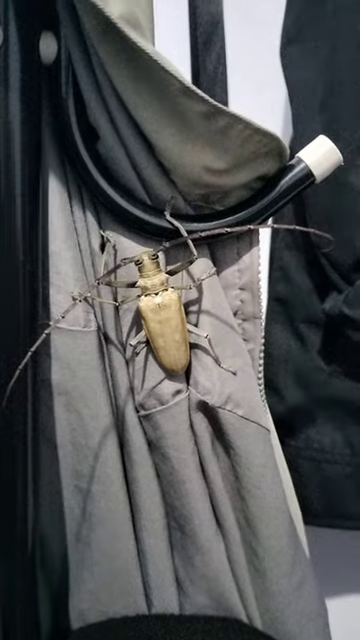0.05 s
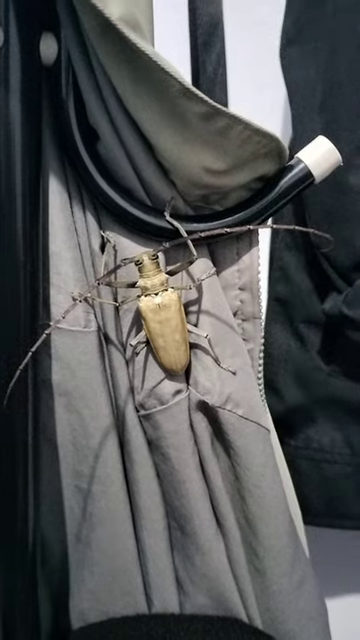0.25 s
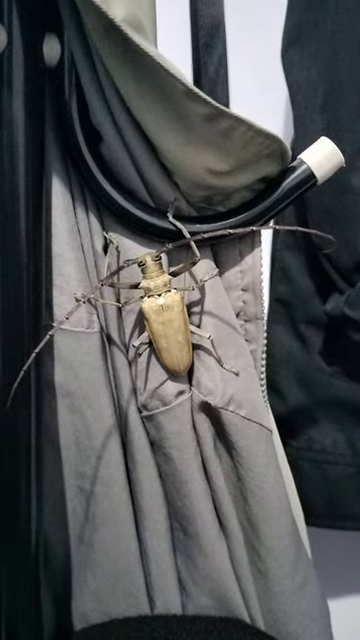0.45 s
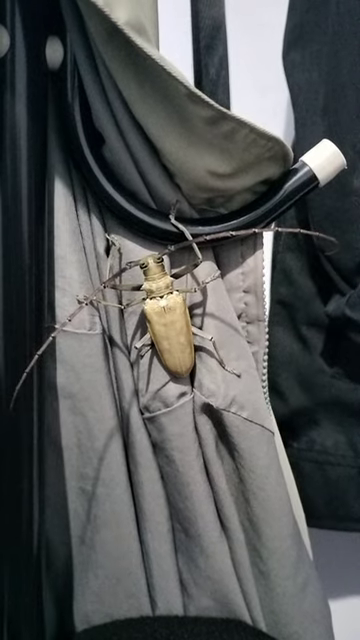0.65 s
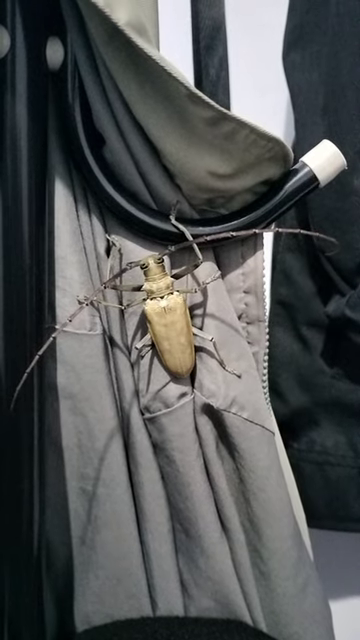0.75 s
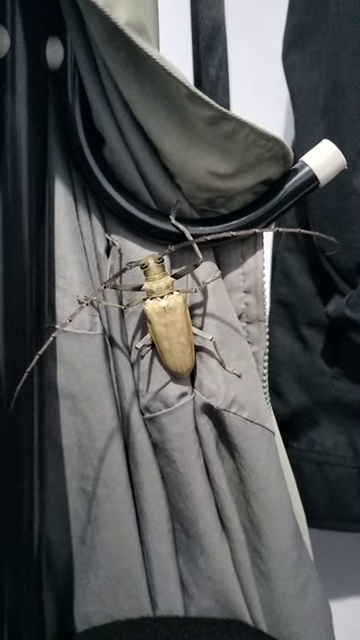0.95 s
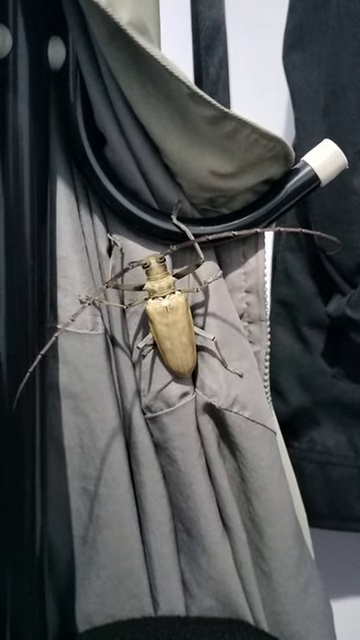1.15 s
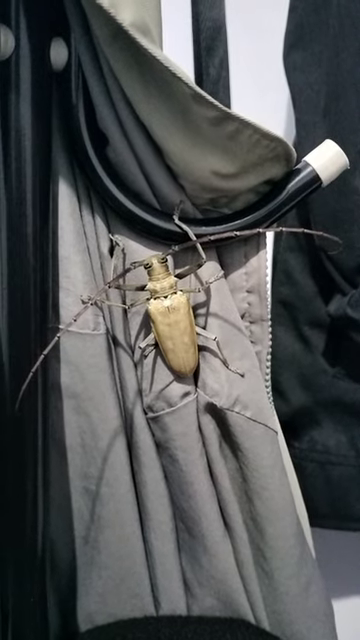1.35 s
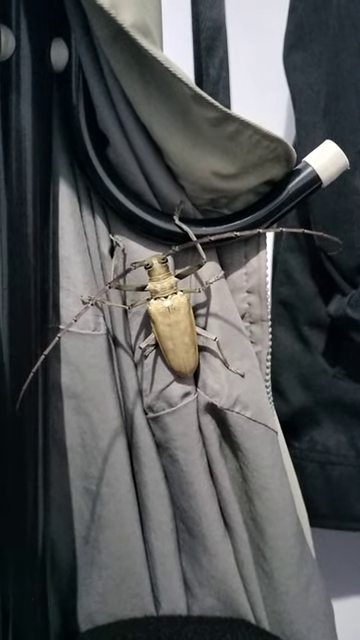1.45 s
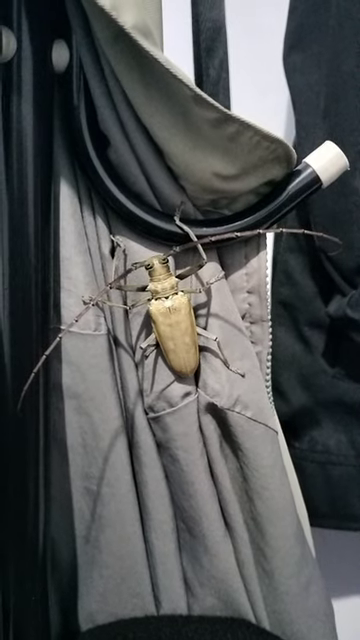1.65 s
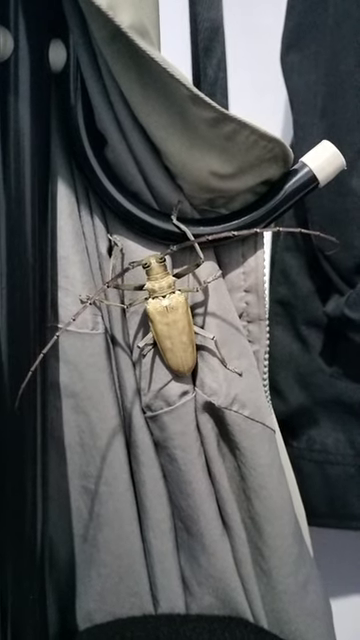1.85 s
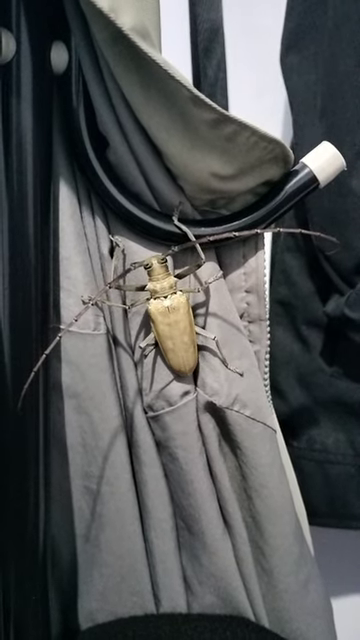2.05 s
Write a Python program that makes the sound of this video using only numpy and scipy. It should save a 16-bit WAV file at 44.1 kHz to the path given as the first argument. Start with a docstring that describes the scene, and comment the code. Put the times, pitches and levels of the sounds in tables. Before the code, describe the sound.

Cloth rustles close to the microphone from about 0.2 seconds, strongest around 0.5, then fades in a few strokes by 1.4, with short fabric groans and soft handling bumps. At 1.5 something hollow knocks a little way off, ringing briefly in the room, then scuffs and slides until 1.8. A faint whistle falls near 2 seconds. A low rumble, hum, thin hiss and faint insect-like buzz lie underneath.

```python
"""Cloth drags and rustles close to the microphone in a few fading strokes: fibre hiss and tiny snaps,
with short groans of the taut fabric and soft handling bumps. A little way off, something hollow
knocks and rings, the room answers, and the object scuffs and slides. Underneath lie a wavering hum,
a low rumble, a thin hiss and an insect-like buzz; a faint whistle falls near the end."""
import sys
import numpy as np
from scipy import signal
from scipy.fft import rfft, irfft, next_fast_len
from scipy.io import wavfile
from scipy.ndimage import map_coordinates

SR = 44100
rng = np.random.default_rng(int(sys.argv[2]) if len(sys.argv) > 2 else 0)


def waveform_to_disk(signal):
    """Save audio, clipped to [-1, 1], as 16-bit WAV at the path in sys.argv[1]."""
    frames = np.transpose(np.atleast_2d(signal))
    scaled = np.clip(frames, -1, 1) * 32767
    samples = np.round(scaled).astype(np.int16)
    wavfile.write(sys.argv[1], SR, samples)


N = 92610
SIDES = np.array([[.5], [-.5]])  # splits a left-minus-right amount between the channels


def amp(db):
    """Decibels to gain."""
    return 10 ** (np.asarray(db) / 20)


def unit(x):
    """Scale to rms 1."""
    return x / np.sqrt(np.mean(x ** 2) + 1e-20)


def clock():
    """Time of every sample in seconds."""
    return np.arange(N) / SR


def along(points, hz):
    """Read (frequency, value) points on a log frequency axis."""
    freqs, values = np.transpose(points)
    return np.interp(np.log(hz + 1), np.log(freqs + 1), values)


def eq(points):
    """A frequency response drawn through (Hz, dB) points."""
    return lambda f: amp(along(points, f))


def curves(rows):
    """One automation curve for each column after the time."""
    times, *columns = np.transpose(rows)
    return [np.interp(clock(), times, column) for column in columns]


def wobble(knots_per_s):
    """A smooth random curve."""
    return map_coordinates(rng.standard_normal(400), [clock() * knots_per_s], mode="mirror")


def filtered(x, response):
    """Pass x through a frequency response."""
    size = next_fast_len(N + SR // 2)
    return irfft(rfft(x, size) * response(np.fft.rfftfreq(size, 1 / SR)), size)[..., :N]


def resonance(f, centre, width):
    """Response of one damped resonance."""
    return 1j * f * width / (centre ** 2 - f ** 2 + 1j * f * width)


def noise():
    """Two unrelated white noises."""
    return rng.standard_normal((2, N))


def spread(pair, colour, likeness, left_lag_s=0):
    """Colour two unrelated signals and blend them into left and right, rms 1."""
    def mid_side(f):
        angle = np.arccos(np.clip(along(likeness, f), -1, 1)) / 2
        return colour(f) * np.array([np.cos(angle), np.sin(angle)])
    mid, side = filtered(pair, mid_side)
    stereo = np.array([mid + side, mid - side])
    return unit(filtered(stereo, lambda f: np.exp(-2j * np.pi * f * SIDES * left_lag_s)))


def envelope(start_s, attack_s, hold_s, t60_s):
    """Linear attack, hold and exponential release."""
    t = clock() - start_s
    return np.clip(t / attack_s, 0, 1) * amp(-60 * np.maximum(t - attack_s - hold_s, 0) / t60_s)


def friction(snaps_per_s=3000, snap_db=-3):
    """Sliding contact: hiss with tiny snaps of random size in it."""
    snaps = (rng.random((2, N)) < snaps_per_s / SR) * np.sign(noise())
    size_db = np.minimum(rng.exponential(size=(2, N)), np.pi)
    return noise() + amp(snap_db) * unit(snaps * amp(size_db))


def early_reflections(x, count=12, span_s=.025, level_db=-5.5):
    """Nearby surfaces colour the sound above the bass, differently on each side; rms 1."""
    delay = rng.uniform(0, span_s, (2, count, 1))
    sign = rng.choice([-1, 1], delay.shape)
    echoes = lambda f: (sign * np.exp(-2j * np.pi * f * delay)).sum(axis=1) / np.sqrt(count)
    return unit(filtered(x, lambda f: 1 + amp(level_db) * echoes(f) * f / (f + 700)))


# Fader ride of the strokes: time_s, level_db
STROKE_LEVELS = [(.228, -43), (.282, -42.3), (.345, -44.5), (.351, -38.5), (.47, -37.8), (.558, -38.4),
                 (.585, -42), (.615, -40.3), (.72, -44.7), (.788, -43.6), (.812, -40.5), (.838, -39.5),
                 (.885, -44), (.925, -49.5), (.98, -54), (1.082, -58), (1.102, -52), (1.162, -50.3),
                 (1.192, -54), (1.222, -49.5), (1.3, -52.8), (1.36, -59), (1.4, -66), (1.5, -70),
                 (1.7, -90)]
# Tone of the cloth: freq_hz, gain_db
CLOTH_EQ = [(35, -46), (60, -39), (91, -12.5), (124, -14.5), (193, -16), (294, -2.5), (469, -7.5),
            (503, -7.5), (698, -7), (946, -1), (1110, -9), (1470, -7), (1820, -10.5), (2090, -6.5),
            (5210, -9.5), (6900, -8.5), (8920, -23.5), (14900, -18.5), (16000, -27.5)]
# Stereo image of the cloth, wider in the treble: freq_hz, correlation
CLOTH_LIKENESS = [(30, .75), (100, 0.99), (280, 0.9), (450, .75), (700, 0.55), (1150, 0.48), (2200, 0.084),
                  (6000, 0.017)]
# Its balance: freq_hz, left_minus_right_db
CLOTH_PAN = [(400, 1.9), (1400, -3), (6500, -3.5), (8300, 9), (10500, -0.5), (14000, -2.5)]
# Its later arrival on the left: freq_hz, lag_s
CLOTH_LAGS = [(250, 0.00013), (500, 0.00022), (1100, 0.00037), (2200, 0.000471)]
def rustle(flutter_db=1.06, air_hz=8140, air_expansion=1.184, trim_db=1):
    """Cloth slides unevenly over cloth: harder strokes are louder and brighter."""
    level_db, = curves(STROKE_LEVELS)
    peak_db = level_db.max()
    effort_db = level_db - peak_db + flutter_db * wobble(knots_per_s=67)
    cloth = early_reflections(spread(friction(), eq(CLOTH_EQ), CLOTH_LIKENESS))
    pan = lambda f: amp(SIDES * along(CLOTH_PAN, f))
    lag = lambda f: np.exp(-2j * np.pi * f * SIDES * along(CLOTH_LAGS, f))
    cloth = filtered(cloth, lambda f: pan(f) * lag(f))
    air = filtered(cloth, lambda f: f > air_hz)
    body = cloth - air
    return amp(peak_db + trim_db) * (body * amp(effort_db) + air * amp(air_expansion * effort_db))


# Tone of the low rumble: freq_hz, gain_db
RUMBLE_EQ = [(22, 0), (42, -9), (65, -3.5), (100, -2), (150, -5.5), (250, -11.5), (420, -11.5),
             (560, -21.5), (900, -19.5), (1200, -27), (2500, -31), (4200, -39.5), (6000, -66)]
# Wavering hum tones: pitch_hz, nominal_width_hz, level_db
HUM_TONES = [(66.4, 10, -61.5), (427.5, 31, -76), (1457, 22, -76.5), (3620, 140, -79.5)]
# Tone of the high hiss: freq_hz, gain_db
HISS_EQ = [(3000, -35), (4200, -26), (4800, -7.5), (5900, -4.5), (7200, -3), (8100, -17.5), (9000, -46),
           (10500, -28), (12500, -17.5), (16000, -18.5)]
# Stereo image of the bed: freq_hz, correlation
BED_LIKENESS = [(70, 0.83), (200, .65), (500, 0.3), (1000, .1), (3000, 0.02)]
def background(rumble_db=-60.5, rumble_swell_db=.98, hiss_db=-71):
    """A bed of gently swelling rumble, a hum of narrow noise bands and a thin steady hiss."""
    bed = lambda colour: spread(noise(), colour, BED_LIKENESS)
    rumble = amp(rumble_db + rumble_swell_db * wobble(knots_per_s=8.84)) * bed(eq(RUMBLE_EQ))
    hum = sum(amp(db) * bed(lambda f: resonance(f, hz, 2 * width) ** 2) for hz, width, db in HUM_TONES)
    hiss = amp(hiss_db) * bed(eq(HISS_EQ))
    return rumble + hum + hiss


def buzz(centre_hz=5300, level_db=-73, swell_db=2.5):
    """A thin far buzz, as of insects: a narrow noise band that swells and ebbs."""
    band = spread(noise(), lambda f: resonance(f, centre_hz, width=520) ** 2, BED_LIKENESS)
    return amp(level_db + swell_db * wobble(knots_per_s=6.95)) * band


# Groans of the taut cloth: start_s, hold_s, level_db, centre_hz
CLOTH_GROANS = [(0.328, 0.0083, -44.5, 298), (0.348, 0.015, -49, 2250), (0.353, 0.18, -48, 167),
                (0.363, 0.19, -66.5, 300), (0.681, 0.21, -53.5, 324), (0.974, 0.088, -50, 205),
                (0.984, 0.082, -56, 640), (1.104, 0.084, -53, 240)]
def groans(q=2.97):
    """Rubbed taut cloth sounds briefly in one resonance after another."""
    out = np.zeros((2, N))
    for start, hold, db, hz in CLOTH_GROANS:
        colour = lambda f: resonance(f, hz, hz / q) / (1 + (f / (5 * hz)) ** 2)
        body = spread(noise(), colour, CLOTH_LIKENESS, left_lag_s=.00012)
        shape = envelope(start, attack_s=.0074, hold_s=hold, t60_s=.21)
        out += amp(db) * unit(body * shape) * np.sqrt(np.mean(shape ** 2))
    return out


# Soft handling bumps: start_s, hold_s, level_db, pitch_hz
HANDLING_BUMPS = [(.355, 0.062, -51, 69), (0.977, 0.096, -56, 110), (1.06, .08, -54, 26),
                  (2.1, 0.053, -49, 32), (1.192, 0.023, -50, 98)]
def bumps(pitch_drift=.1):
    """Each bump shakes the microphone for a few uneven low cycles."""
    out = np.zeros(N)
    for start, hold, db, hz in HANDLING_BUMPS:
        pitch_hz = hz * (1 + pitch_drift * wobble(knots_per_s=40))
        swing = np.sqrt(2) * np.sin(2 * np.pi * np.cumsum(pitch_hz) / SR)
        out += amp(db) * envelope(start, attack_s=.018, hold_s=hold, t60_s=.2) * swing
    return out


# Hits on the hollow object: start_s, level_db
CONTACTS = [(1.4565, -48), (1.468, -42), (1.473, -38.5), (1.501, -49)]
# Its resonances: pitch_hz, width_hz, gain_db
HOLLOW_MODES = [(698, 115, -4.5), (858, 77, -2.5), (953, 62, -2), (1280, 160, -14.5)]
# Its stereo image: freq_hz, correlation
OBJECT_LIKENESS = [(300, 1), (700, 0.92), (1300, 0.04), (5000, 0.026)]
OBJECT_LAG_S = -.00014  # reaches the left side first
def knock(room_db=-2):
    """A quick cluster of rough contacts rings the hollow object, and the room answers."""
    hits = [amp(db) * envelope(start, attack_s=.0011, hold_s=0, t60_s=.21) for start, db in CONTACTS]
    force = np.sqrt(sum(hit ** 2 for hit in hits))
    contact = force * spread(friction(), np.ones_like, OBJECT_LIKENESS, OBJECT_LAG_S)
    shell = lambda f: sum((-1) ** k * amp(db) * resonance(f, hz, width)
                          for k, (hz, width, db) in enumerate(HOLLOW_MODES))
    ring = unit(filtered(contact, shell)) * np.sqrt(np.mean(force ** 2))
    return ring + amp(room_db) * room(ring)


# Reverb time of the room: freq_hz, t60_s
ROOM_DECAY = [(200, 0.22), (900, 0.56), (4000, 0.92), (12000, 0.13)]
def room(x):
    """The diffuse tail: each frequency dies at its own speed."""
    hz, t, spectrum = signal.stft(rng.standard_normal((2, SR // 2)), SR, nperseg=256)
    decay = amp(-60 * t / along(ROOM_DECAY, hz)[:, None])
    _, tail = signal.istft(spectrum * decay, SR, nperseg=256)
    tail /= np.linalg.norm(tail[0])
    return signal.fftconvolve(x, tail, axes=1)[:, :N]


# Tone of the landing scrape: freq_hz, gain_db
LANDING_EQ = [(150, -24.5), (370, 6.5), (550, 2), (1100, -8), (1700, 2.5), (2100, 4), (2600, 4.5),
              (3000, -0.5), (3600, 5.5), (4600, -8.5), (7200, -11), (9000, -32), (12000, -26), (16000, -28)]
# Tone of the softer, thinner slide: freq_hz, gain_db
SLIDE_EQ = [(200, -33), (480, 3), (800, -9), (1200, -15), (1500, -1.5), (1750, -3.5), (2020, 6), (2400, -1),
            (3300, -4.5), (4200, -16.5), (7000, -12.5), (9000, -40), (13000, -27), (16000, -28)]
def scuff(landing_db=-43.5, slide_db=-54.5, left_minus_right_db=-2.5):
    """The object scrapes as it lands, then slides a little more."""
    grit = lambda tone: early_reflections(spread(friction(), eq(tone), OBJECT_LIKENESS, OBJECT_LAG_S))
    landing = envelope(start_s=1.462, attack_s=.016, hold_s=0, t60_s=.54) * grit(LANDING_EQ)
    slide = envelope(start_s=1.592, attack_s=.06, hold_s=.037, t60_s=.46) * grit(SLIDE_EQ)
    return (amp(landing_db) * landing + amp(slide_db) * slide) * amp(SIDES * left_minus_right_db)


# Contour of the whistle: time_s, pitch_hz, level_db
WHISTLE_GLIDE = [(1.82, 980, -86), (1.87, 1005, -71), (1.915, 1003, -69), (1.948, 960, -64),
                 (1.99, 925, -74), (2.03, 855, -79), (2.07, 830, -92)]
def whistle(room_db=-4):
    """A faint far tone holds and then falls, with a little reverb."""
    pitch_hz, level_db = curves(WHISTLE_GLIDE)
    sounding = (clock() > WHISTLE_GLIDE[0][0]) & (clock() < WHISTLE_GLIDE[-1][0])
    tone = sounding * amp(level_db) * np.sin(2 * np.pi * np.cumsum(pitch_hz) / SR)
    centred = np.tile(tone, (2, 1))
    return centred + amp(room_db) * room(centred)


def scene():
    """The stereo mix of all sources."""
    return rustle() + groans() + bumps() + knock() + scuff() + whistle() + background() + buzz()


def record(dry, open_s=.2225, top_hz=16000):
    """The sound cuts in abruptly and passes through a steep high cut."""
    gated = dry * (clock() > open_s)
    return filtered(gated, lambda f: np.clip((top_hz - f) / 200, 0, 1))


dry = scene()
out = record(dry)
waveform_to_disk(out)
```